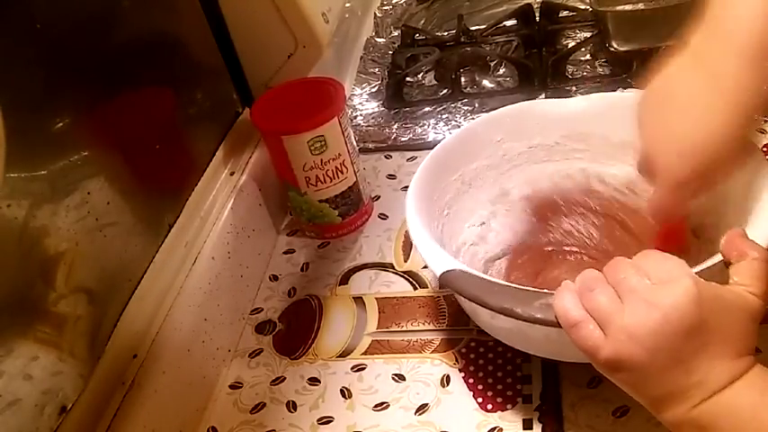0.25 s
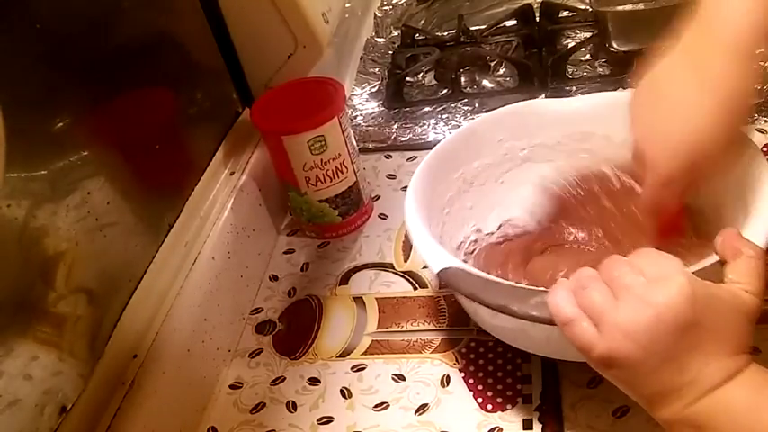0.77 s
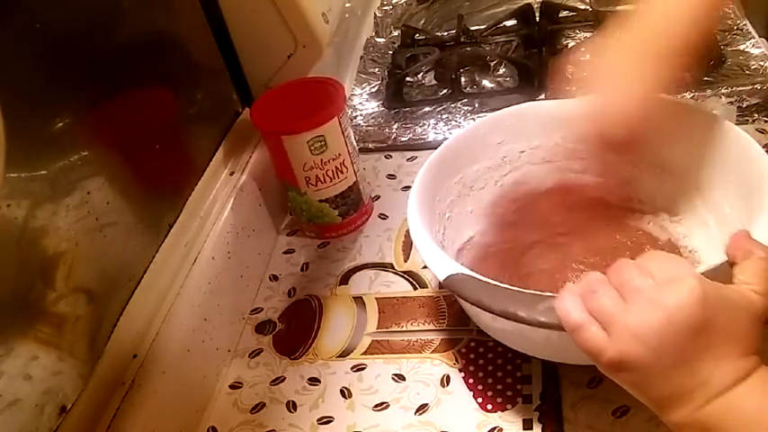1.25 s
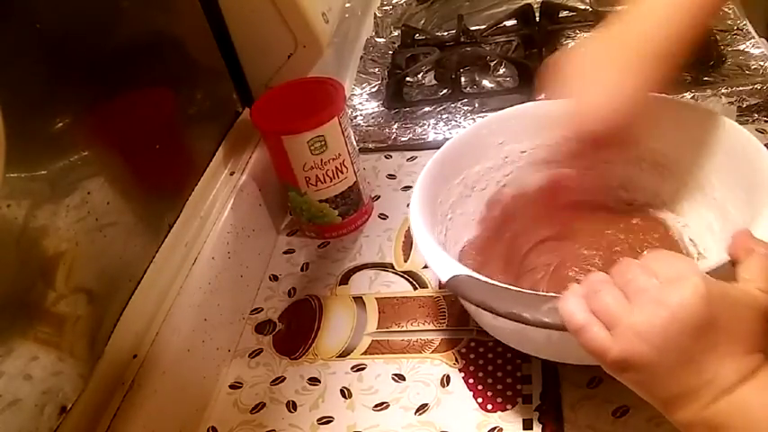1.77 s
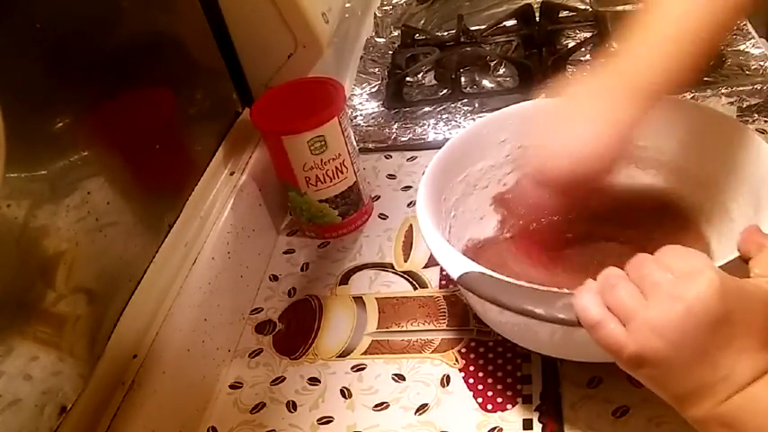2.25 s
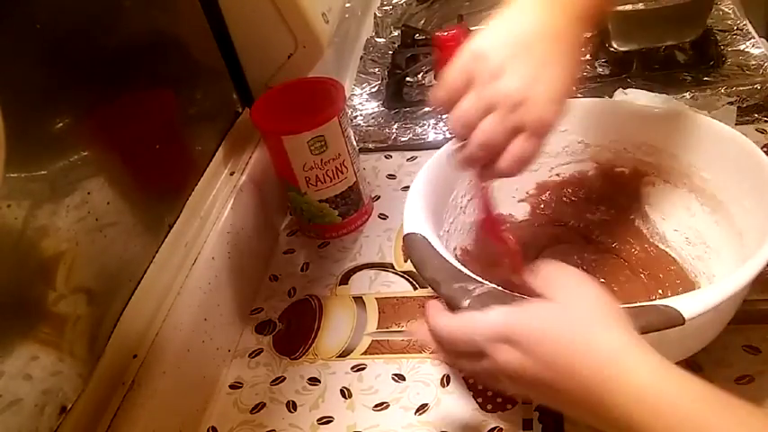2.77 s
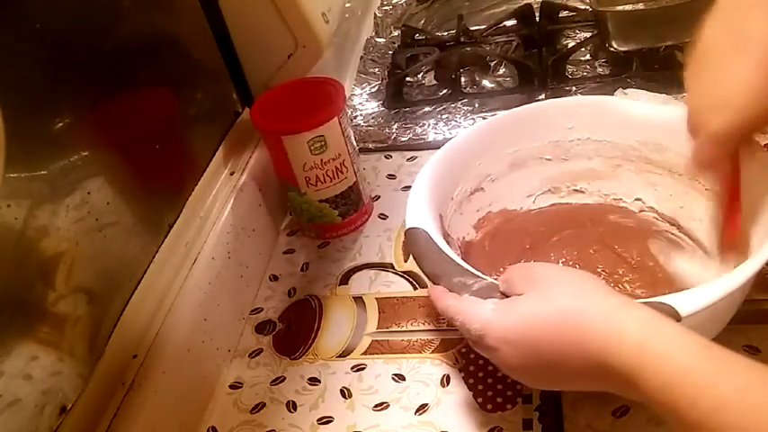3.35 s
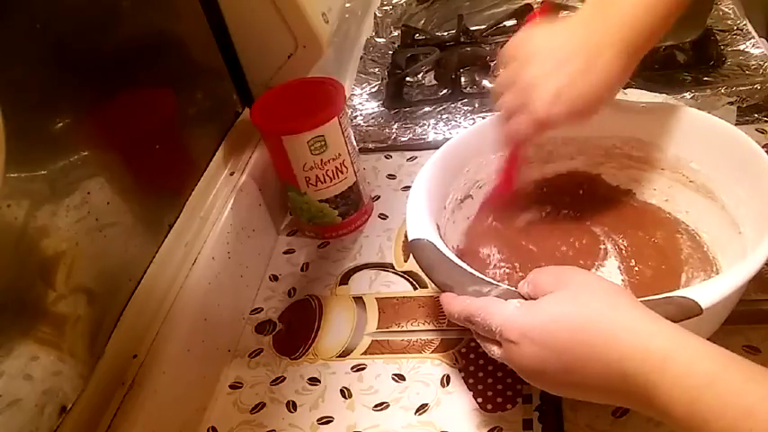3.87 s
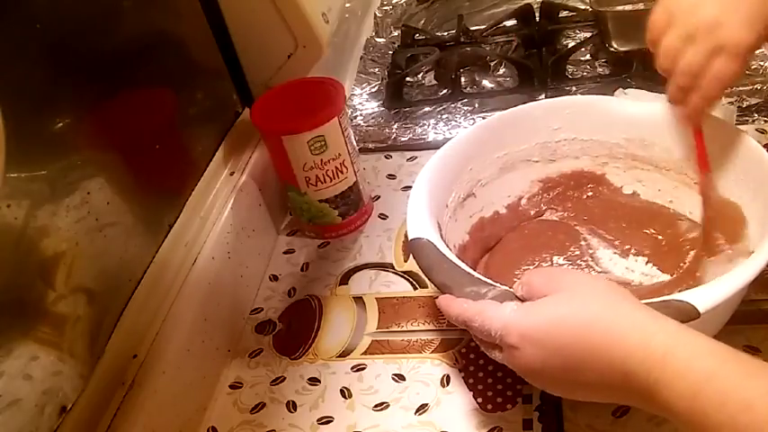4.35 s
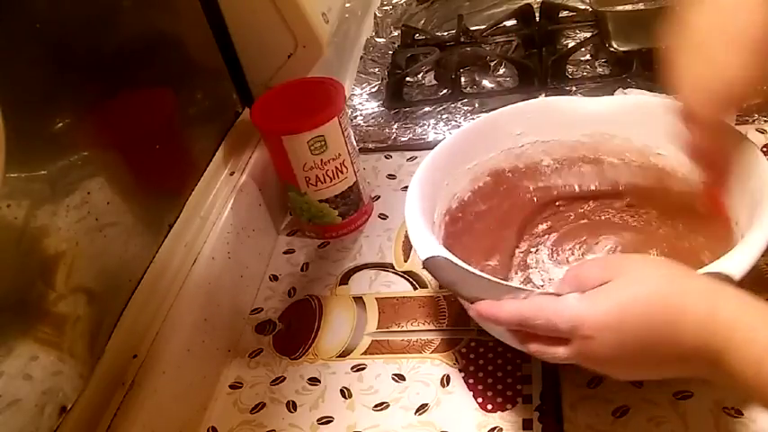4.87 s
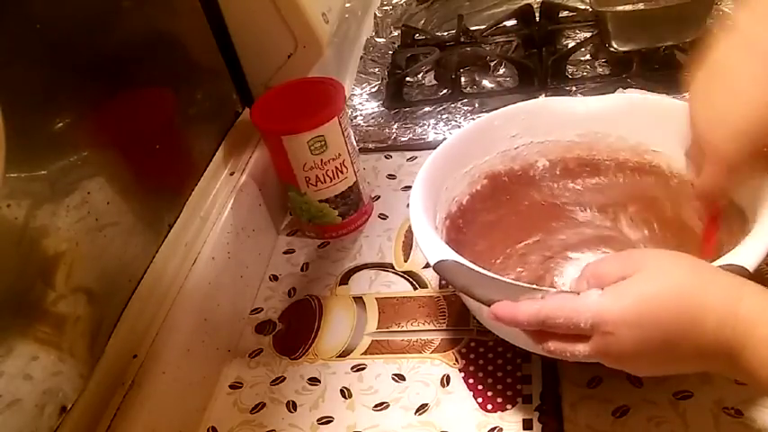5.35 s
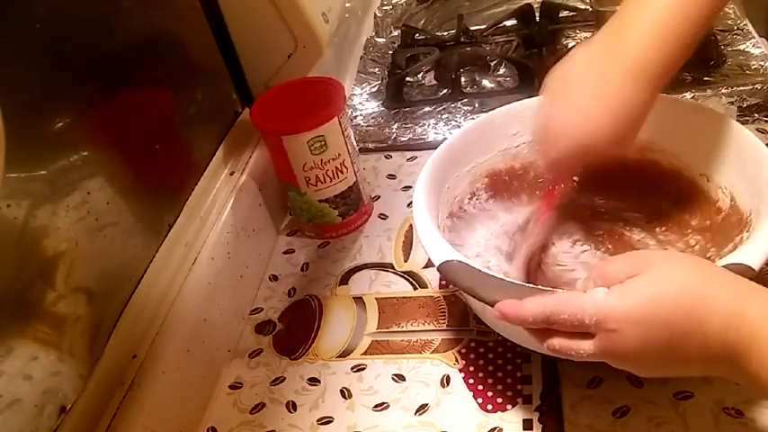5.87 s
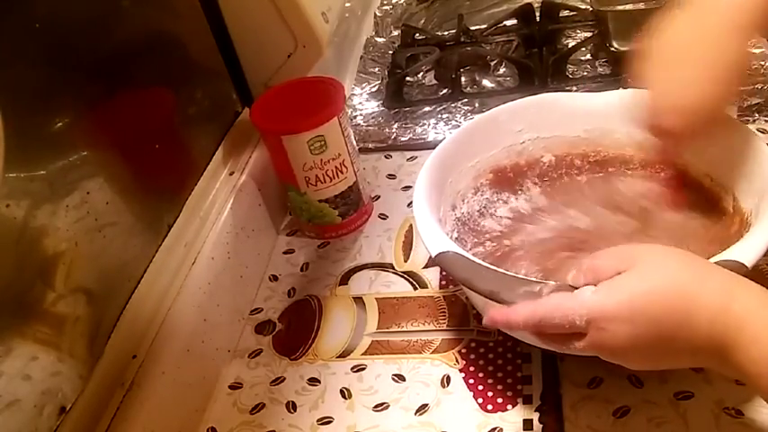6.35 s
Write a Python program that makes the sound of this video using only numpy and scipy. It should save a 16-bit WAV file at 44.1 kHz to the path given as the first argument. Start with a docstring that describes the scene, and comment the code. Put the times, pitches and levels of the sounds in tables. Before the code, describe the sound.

A close, mono perspective in a small, quiet kitchen with a short room tail and barely audible hush. From 0 to 2.7 seconds a flexible spatula beats thick batter in a plastic bowl at three to four strokes a second: low heaving churn, wet rubbing on the wall, gulps, squelches and sticky snaps. Dull, hollow knocks of the bowl on the counter come roughly every quarter second; the loudest wet smack lands near 1.5, with others at 1.75 and 2.3. A lull follows around 2.8. From 3.1 to 3.7 the blade wipes the floury wall in a dry, bright rasp, in two swells, the second strongest near 3.5. From 3.8 slow, soft folding strokes with sparse pops; after 4.9 strokes quicken, lighter than before, with more floury hiss, small wet clicks from 5.4 and a sharp snap near 6.3. It ends mid-stir at about 6.6.

```python
"""Beating cake batter

A silicone spatula beats thick batter in a plastic bowl on a counter, in a small, quiet kitchen.
Fast strokes rub the wall (shaped noise), knock the bowl (damped modes) and smack air pockets (noise bursts).
Then the blade wipes round the floury wall (a noisy rasp) and folds on more gently.
"""
import sys
import numpy as np
from scipy import signal
from scipy.fft import rfft, irfft, next_fast_len
from scipy.io import wavfile
from scipy.ndimage import uniform_filter1d, map_coordinates

SR = 44100
rng = np.random.default_rng(int(sys.argv[2]) if len(sys.argv) > 2 else 0)


def inscribe(sig):
    """Save sig as 16-bit PCM at rate SR to the path in sys.argv[1].

    A 1-D sig is mono; a 2-D sig holds one channel per row.
    Samples are clipped to [-1, 1] before scaling.
    """
    pcm = np.round(np.clip(np.atleast_2d(sig).T, -1, 1) * 32767)
    wavfile.write(sys.argv[1], SR, pcm.astype(np.int16))


N = 291501  # length in samples


def amp(db):
    """Level to amplitude: 20 dB is a factor of ten."""
    return 10 ** (np.asarray(db) / 20)


def unit(x):
    """Normalisation: x at rms 1."""
    return x / np.sqrt(np.mean(x ** 2) + 1e-20)


def decay(t, t60):
    """Exponential decay: amplitude falls 60 dB in t60."""
    return np.exp(-np.log(1000) * t / t60)


def along(points, hz):
    """Logarithmic frequency scale: (Hz, value) points interpolated at hz."""
    f, v = np.transpose(points)
    return np.interp(np.log(hz + 1), np.log(f + 1), v)


def curves(rows):
    """Linear interpolation: one value per sample for each column after the time."""
    s, *columns = np.transpose(rows)
    return [np.interp(np.arange(N) / SR, s, c) for c in columns]


def wobble(rate, size):
    """Band-limited fluctuation: a smooth random curve with rate knots a second."""
    knots = rng.standard_normal(int(size * rate / SR) + 4)
    return map_coordinates(knots, [np.arange(size) * rate / SR])


def coloured(x, spectrum):
    """Minimum-phase filtering: the folded cepstrum turns (Hz, dB) points into a causal filter."""
    m = 2 * next_fast_len(len(x) // 2 + SR // 20)
    log_gain = np.log(amp(along(spectrum, np.fft.rfftfreq(m, 1 / SR))))
    cepstrum = irfft(log_gain, m)
    cepstrum[1:m // 2] *= 2
    cepstrum[m // 2 + 1:] = 0
    response = np.exp(rfft(cepstrum))
    return irfft(rfft(x, m) * response, m)[:len(x)]


def add(track, s, sound):
    """Superposition: mix a sound into the track at time s."""
    start = int(np.clip(round(s * SR), 0, N - 1))
    track[start:start + len(sound)] += sound[:N - start]


def friction(spectrum, rate, grain_db, flutter_db, patchy_db):
    """Stick-slip friction: shear noise and sticky ruptures (rate a second), with shifting level and colour."""
    ruptures = (rng.random(N) < rate / SR) * rng.standard_normal(N)
    drive = rng.standard_normal(N) + amp(grain_db) * unit(ruptures)
    grip = amp(flutter_db * wobble(70, size=N))
    z = signal.stft(drive * grip, nperseg=512)[2]
    # random gain, smoothed over frequency and then time: the colour shifts as the blade travels
    field = uniform_filter1d(rng.standard_normal(z.shape), size=4, axis=0)
    field = uniform_filter1d(field, size=9, axis=1)
    shifting = signal.istft(z * amp(patchy_db * unit(field)), nperseg=512)[1][:N]
    return unit(coloured(shifting, spectrum))


# The kitchen's own noise spectrum: pitch_hz [Hz], density_db [relative dB per Hz]
QUIET_SPECTRUM = [(25, -17), (100, -14.5), (330, 11), (550, -6.5), (1200, -20.5), (3000, -18),
                  (5000, -25.5), (7500, -29), (15500, -18.5)]
WHINE_HZ = 15040


def background():
    """Stationary noise: a quiet kitchen, with a faint electronic whine of wandering phase."""
    whine = np.sin(2 * np.pi * WHINE_HZ * np.arange(N) / SR + 0.65 * wobble(19, size=N))
    hush = unit(coloured(rng.standard_normal(N), QUIET_SPECTRUM))
    return amp(-71.5) * hush + amp(-87.5) * whine


# Strokes of the blade through the batter: start_s [s], length_s [s],
# push_db on the batter [relative dB], rub_db on the wall [relative dB]
STROKES = [(-0.05, 0.44, -56.5, -63), (0.235, 0.37, -55.5, -62.5), (0.525, 0.23, -63.5, -57),
           (0.766, 0.2, -53, -60), (1.014, 0.26, -56.5, -57.5), (1.272, 0.28, -54.5, -60),
           (1.548, .25, -52, -58), (1.846, 0.33, -55.5, -60.5), (2.105, 0.34, -55, -59),
           (2.398, 0.24, -55.5, -58), (2.628, 0.19, -58.5, -62), (3.061, 0.61, -59, -76),
           (3.778, 0.11, -63, -73), (3.954, 0.37, -59, -62), (4.384, 0.35, -61, -68.5),
           (4.864, 0.31, -61, -66.5), (5.085, .16, -60, -62.5), (5.318, .1, -60, -70),
           (5.443, .14, -57, -64.5), (5.748, .2, -59.5, -64), (6.038, 0.41, -56.5, -65)]
ATTACK_S, LIFT_S = 0.037, 0.25  # the blade digs in and lifts away
BRISK_PUSH_DB = -52  # push that digs in within ATTACK_S; gentler strokes take longer
PUSH_SAG_DB_PER_S, RUB_SAG_DB_PER_S = 6, 10  # the blade slows, and leaves the wall sooner than the batter


def effort():
    """Power addition: strokes rise, sag and die away; overlapping powers sum to push and rub in dB."""
    t = np.arange(N) / SR
    power = np.full((2, N), 1e-10)
    for start, length, push_db, rub_db in STROKES:
        first = max(int(start * SR), 0)
        age = np.maximum(t[first:first + SR] - start, 0)
        attack = ATTACK_S * amp(BRISK_PUSH_DB - push_db)
        rise = np.minimum(age / attack, 1)
        lift = np.clip(1 - (age - length) / LIFT_S, 0, 1) ** 2
        sagging = amp([push_db - PUSH_SAG_DB_PER_S * age, rub_db - RUB_SAG_DB_PER_S * age])
        power[:, first:first + SR] += (rise * lift * sagging) ** 2
    return 10 * np.log10(power)


def slosh():
    """Damped inertia: after each knock the mass of batter moves on and settles; its level decays."""
    out, t = np.zeros(N), np.arange(SR // 2) / SR
    for s, db in KNOCKS:
        add(out, s, amp(db - 19.5) * decay(t, 0.2))
    return out


# The hollow of the bowl, colouring bubbles and smacks: pitch_hz [Hz], gain_db [relative dB]
CAVITY = [(300, 13), (430, 7.5), (540, 11), (750, 1), (1010, 0), (1250, -10.5), (1550, -3), (2200, -4),
          (2900, -12), (3600, -10.5), (4400, -5), (5600, -1.5), (6600, -15.5), (15500, -22.5)]


def bubbles(level_db, rate):
    """Bubble resonance: small bubbles break in sheared batter, each a few cycles at its own pitch."""
    out, t = np.zeros(N), np.arange(SR // 60) / SR
    for when, pitch, size in rng.random((int(rate * N / SR), 3)):
        hz = 900 * 6.5 ** pitch
        pop = np.sin(2 * np.pi * hz * t) * decay(hz * t, 3.2)  # 60 dB down in 3.2 cycles
        add(out, when * N / SR, amp(level_db[int(when * N)] + 43 * size ** 2) * pop)
    return coloured(out, CAVITY)


# Spectra of the shifting mass, the churned batter, the smear on the wall and the hiss of the wall:
# pitch_hz [Hz], density_db [relative dB per Hz]
HEAVE_SPECTRUM = [(25, -23), (60, -6), (110, 0), (190, 0), (280, -10.5), (500, -44.5)]
CHURN_SPECTRUM = [(120, -25.5), (230, -2), (330, 5.5), (430, 1), (540, -2), (720, -5), (980, -7.5),
                  (1250, -21), (2200, -32.5)]
SMEAR_SPECTRUM = [(600, -11.5), (950, -12.5), (1250, 5), (1550, 3), (2050, 6.5), (2450, -4), (3000, -4),
                  (3600, -28), (5000, -32)]
HISS_SPECTRUM = [(2400, -32.5), (3500, -14), (4000, -8), (4450, -4), (5600, -2.5), (6400, -11.5),
                 (8500, -12), (12000, -15.5), (15500, -14)]
# Dry flour turned up from the bottom: time_s [s], hiss_over_rub_db [dB]
FLOUR = [(4.6, -4.5), (5.0, 1)]


def stirring():
    """Viscous shear: batter heaves and churns under the push; the rub drives smear, hiss and wet crackle."""
    push_db, rub_db = effort()
    flour_db, = curves(FLOUR)
    vigour = np.clip((push_db + 67) / 10, .35, 1)  # hard beating is lumpier than gentle folding
    heave = friction(HEAVE_SPECTRUM, rate=55, grain_db=-11.5, flutter_db=0.5, patchy_db=3.5)
    heave *= np.hypot(amp(push_db - 5), slosh())
    churn = friction(CHURN_SPECTRUM, rate=110, grain_db=-10, flutter_db=3.5 * vigour, patchy_db=2.0)
    churn *= amp(push_db + 0.33)
    smear = friction(SMEAR_SPECTRUM, rate=490, grain_db=-8, flutter_db=2.7 * vigour, patchy_db=-0.5)
    smear *= amp(rub_db - 2.4)
    hiss = friction(HISS_SPECTRUM, rate=260, grain_db=-19.5, flutter_db=3.7 * vigour, patchy_db=-3.5)
    hiss *= amp(rub_db + flour_db)
    crackle = vigour * bubbles(rub_db - 10.5, rate=110)
    return heave + churn + smear + hiss + crackle


# Air pockets bursting in the batter: start_s [s], level_db of gulp and squelch [relative dB],
# snap_db of the film [relative dB], spray_over_snap_db [dB], opening_s time scale [s], radius_mm [mm]
SMACKS = [(0.004, -52.5, -65, -19, 0.0047, 2.03), (0.107, -53, -82, -6, 0.016, 3.9),
          (0.197, -53, -84, -5, 0.0034, 2.75), (0.2436, -55, -57, -18, 0.0036, 2.3),
          (0.2635, -52, -52.5, -8.5, .004, 2.7), (0.3045, -51.5, -64, -12, 0.0027, 2.9),
          (0.419, -58, -60.5, -3, .011, 3.0), (0.448, -53, -82, 8, 0.0073, 3.9),
          (0.5134, -58, -55, -10.5, 0.003, 1.9), (0.529, -50.5, -59.5, -4, 0.0011, 3.4),
          (0.5756, -46, -42.5, -2.5, 0.0027, 2.56), (0.666, -57, -53.5, 1, 0.0047, 0.98),
          (0.681, -57, -49.5, 0, 0.00086, 0.84), (0.694, -50.5, -59, -21.5, 0.003, 2.26),
          (0.778, -46, -56, -1, 0.022, 2.64), (0.833, -52, -75, -3, 0.0037, 2.1),
          (0.927, -48, -51, -27, 0.002, 1.96), (0.972, -52.5, -52, -21, 0.0015, 3.85),
          (1.051, -45.5, -60, -2, 0.0072, 2.8), (1.069, -55, -75, 3, 0.0051, 2.6),
          (1.089, -52.5, -66, 0, 0.0021, 1.8), (1.112, -48.5, -66, 4, 0.0062, 2.6),
          (1.1315, -51, -60, 5.5, 0.0018, 2.3), (1.191, -56.5, -63, -3, 0.0024, 5),
          (1.211, -44.5, -56, -3.5, 0.0047, 1.9), (1.2947, -41, -55.5, -25, 0.0034, 2.57),
          (1.32, -50.5, -61, -6.5, 0.0015, 3.2), (1.3706, -57, -77, -8, 0.0089, 4.2),
          (1.401, -57.5, -48, -9, 0.01, 1.6), (1.4434, -55, -70, 6, 0.0082, 4.2),
          (1.464, -41, -54, -5.5, 0.012, 2.25), (1.4892, -29, -39, -7.5, 0.0021, 2.7),
          (1.6085, -67.5, -52, -32, 0.0018, 0.79), (1.66, -51.5, -65, -18, 0.0012, 6.9),
          (1.669, -53.5, -54, -21, 0.0047, 1.32), (1.755, -39.5, -40.5, -8, 0.002, 2.74),
          (1.8487, -49.5, -71, 8, 0.013, 2.33), (1.94, -50, -49, -9.5, 0.0055, 3.1),
          (2.032, -43, -53.5, -8, 0.018, 2.8), (2.061, -47, -73, 0, 0.0026, 3.1),
          (2.178, -42, -48.5, -10, 0.0036, 2.4), (2.22, -49.5, -48.5, -12, 0.0077, 1.8),
          (2.2967, -47, -58.5, 0, 0.013, 2.2), (2.3212, -36.5, -34, -18, 0.0014, 2.67),
          (2.4345, -44, -80, -9, 0.0035, 3.07), (2.47, -45, -78, 15, 0.013, 2.75),
          (2.494, -46.5, -57, -18, .004, 2.37), (2.5836, -57, -56.5, -10, 0.0053, 2.8),
          (2.669, -51, -64, -4, 0.015, 3.15), (2.815, -63, -51, -2, 0.019, 3.4),
          (3.823, -74, -84.5, 10, 0.0046, 3.2), (4.0915, -55, -75, -9, 0.0049, 2.1),
          (4.656, -67.5, -97, -3, 0.006, 3.9), (4.798, -65, -60, -1, 0.01, 2.4),
          (4.885, -70, -66.5, 5, 0.0088, 2.8), (4.962, -73, -73.5, 14, 0.028, 2),
          (5.0052, -66, -54.5, 3.5, 0.0015, 1.7), (5.064, -67.5, -84, 4, 0.0034, 5.7),
          (5.1403, -66, -46.5, -14, 0.0034, 1.36), (5.379, -64.5, -62, -9, 0.0027, 1.8),
          (5.4572, -51.5, -70, 1, 0.01, 3), (5.484, -50, -47.5, -6, 0.0036, 2.13),
          (5.5603, -47.5, -54.5, 5, 0.0045, 1.26), (5.622, -64, -69.5, 11, 0.0029, 1.3),
          (5.7056, -54.5, -70.5, 4, 0.012, 1.92), (5.833, -49, -48.5, -6, 0.0028, 2.05),
          (5.949, -62.5, -52.5, -2, 0.007, 1.08), (6.083, -63, -57, -3, 0.0046, 1.5),
          (6.263, -53.5, -62, -13, .0054, 2.8), (6.292, -57, -39, -15.5, 0.0052, 1.03)]
# Bands of gulp, squelch, click and spray: low_hz [Hz], high_hz [Hz]
REGISTERS = [(350, 1430), (1200, 2630), (3200, 6080), (6500, 13000)]
POCKET_HZ_MM = 3205  # a pocket's resonance times its radius
EVEN_RADIUS_MM, GULP_DB_PER_DOUBLING = 2.11, 10  # larger pockets gulp more and squelch less


def smacks():
    """Cavity resonance: a pocket tears in a noisy burst and rings higher the smaller it is."""
    out, lead = np.zeros(N), .012  # seconds of faint noise leading in
    t = np.arange(SR // 10) / SR - lead
    after = np.maximum(t, 0)
    lead_in = .055 * decay(np.abs(t), .035)
    bands = []
    for edges in REGISTERS:
        edges = np.clip(edges, 50, SR / 2 - 100)
        bands.append(signal.butter(3, edges, "band", fs=SR, output="sos"))
    hollow = coloured(signal.unit_impulse(SR // 40), CAVITY)
    for s, db, snap_db, spray_db, duration, radius in SMACKS:
        depth_db = GULP_DB_PER_DOUBLING * np.log2(radius / EVEN_RADIUS_MM)
        levels = db + depth_db, db - depth_db, snap_db, snap_db + spray_db
        u = after / max(duration, 1 / 800)
        opening = (1 - np.exp(-7 * u)) * (np.exp(-.7 * u) + 0.12 * decay(after, 0.17))
        tearing = (lead_in + opening) * amp(1.82 * wobble(924.6, size=len(t)))
        pocket = signal.iirpeak(np.clip(POCKET_HZ_MM / radius, 300, 6000), 6, fs=SR)
        for band, band_db in zip(bands, levels):
            # films of different size give way at slightly different moments
            films = tearing * amp(3.5 * wobble(286.4, size=len(t))) * rng.standard_normal(len(t))
            ringing = films + 1.44 * signal.lfilter(*pocket, films)
            burst = signal.fftconvolve(ringing, hollow)[:len(t)]
            add(out, s - lead, amp(band_db - 9.5) * unit(signal.sosfilt(band, burst)))
    return out


# The bowl's foot knocking on the counter: start_s [s], level_db [relative dB]
KNOCKS = [(0.142, -25.5), (0.415, -26.5), (0.622, -37), (0.657, -31), (0.841, -50), (0.961, -23.5),
          (1.19, -34.5), (1.39, -40), (1.478, -24), (1.661, -48), (1.749, -23), (1.936, -51.5), (2.04, -22),
          (2.308, -23.5), (2.623, -32), (5.422, -53), (5.763, -48)]
# Modes of bowl and counter together, before each blow varies them:
# pitch_hz [Hz], level_db [relative dB], t60_s [s]
BOWL_MODES = [(63, -30, 0.16), (109, 0.5, 0.057), (154, 5, 0.069), (226.4, -5.5, 0.091), (272.4, -10, 0.18),
              (306.1, -5, .19), (359, -13, 0.084), (407.4, -8, 0.22), (537.6, -14.5, 0.48),
              (634, -15, 0.03), (1007, -19.5, 0.21)]


def knocks():
    """Modal synthesis: batter-damped modes ring, and a close reflection repeats the blow 8.5 ms later."""
    out, t = np.zeros(N), np.arange(SR // 3) / SR
    hz, mode_db, t60 = np.transpose(BOWL_MODES)[:, :, None]
    sign = -(-1) ** np.arange(len(BOWL_MODES))[:, None]  # neighbouring modes swing against each other
    for s, db in KNOCKS:
        strength = sign * amp(mode_db + 1.8 * rng.standard_normal(hz.shape))
        load = 1 + 0.0091 * rng.standard_normal(hz.shape)  # the shifting batter detunes the bowl
        modes = strength * np.sin(2 * np.pi * hz * load * t) * decay(t, t60)
        blow = amp(db - 17.0) * unit(np.sum(modes, axis=0))
        add(out, s, blow)
        add(out, s + .0085, 0.68 * blow)
    return out


# The blade wiping the floury wall: time_s [s], rasp_db [relative dB]
WIPE = [(3.03, -70), (3.048, -84), (3.068, -64.5), (3.246, -46.5), (3.344, -57), (3.456, -47.5),
        (3.484, -37.5), (3.664, -66.5), (3.72, -77)]
# Spectra of the blade barely touching and pressed flat: pitch_hz [Hz], density_db [relative dB per Hz]
LIGHT_WIPE_SPECTRUM = [(500, -33), (950, -8), (1250, -16), (1600, -1), (2000, 0.5), (2700, -8), (3500, -12),
                       (4300, -4.5), (5600, -0.5), (6400, -15), (11000, -17), (15500, -24)]
HARD_WIPE_SPECTRUM = [(500, -21), (980, -12), (1300, -27), (1900, -4), (2700, -6), (3100, -8), (3700, -8),
                      (4300, 2.5), (5700, -6.5), (6500, -14), (11000, -19.5), (15500, -38)]


def wiping():
    """Dry friction: silicone rasps over flour; a louder, harder press fills the gap between two resonances."""
    rasp_db, = curves(WIPE)
    pressure = np.clip((rasp_db + 47.5) / 9, 0, 1)
    light = friction(LIGHT_WIPE_SPECTRUM, rate=1200, grain_db=-6.5, flutter_db=1.5, patchy_db=4.5)
    hard = friction(HARD_WIPE_SPECTRUM, rate=3100, grain_db=-10.5, flutter_db=-2.2, patchy_db=0.9)
    t = np.arange(N) / SR
    touching = (t > WIPE[0][0]) & (t < WIPE[-1][0])
    rasp = np.sqrt(1 - pressure) * light + np.sqrt(pressure) * hard  # equal-power blend
    return touching * amp(rasp_db - 0.5) * rasp


# Reverberation of the kitchen: pitch_hz [Hz], t60_s [s]
KITCHEN_T60 = [(120, 0.26), (500, 0.21), (2000, 0.26), (6000, 0.067), (15000, 0.44)]


def kitchen(x):
    """Reverberation: a short decaying-noise tail, drawn afresh for each quarter second."""
    out, hop = np.zeros(N), SR // 4
    for start in range(0, N, hop):
        hz, t, z = signal.stft(rng.standard_normal(SR // 2), SR, nperseg=256)
        fading = z * decay(t, along(KITCHEN_T60, hz)[:, None])
        tail = signal.istft(fading, SR, nperseg=256)[1]
        reply = signal.fftconvolve(x[start:start + hop], tail / np.linalg.norm(tail))
        add(out, start / SR + .005, reply)
    return out


def scene():
    """Direct and reverberant field: bowl and batter close by, with the room around them."""
    pops, bowl = smacks(), knocks()
    stir = stirring() + wiping()
    room = kitchen(amp(-6.5) * bowl + amp(-7.0) * pops + amp(-9.5) * stir)
    return (bowl + pops + stir + room + background())[None]


TOP_HZ = 15900  # upper band limit of the sound


def record(dry):
    """Band limitation: the deepest bass is thinned and nothing sounds above TOP_HZ."""
    thin = signal.sosfilt(signal.butter(2, 48, "high", fs=SR, output="sos"), dry)
    m = next_fast_len(N + SR // 4)
    passed = np.fft.rfftfreq(m, 1 / SR) < TOP_HZ
    return irfft(rfft(thin, m) * passed, m)[:, :N]


dry = scene()
out = record(dry)
inscribe(out)
```